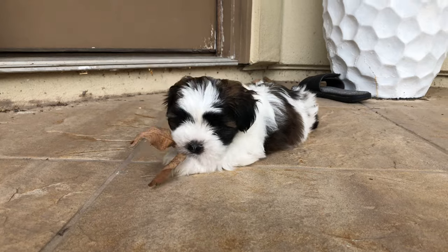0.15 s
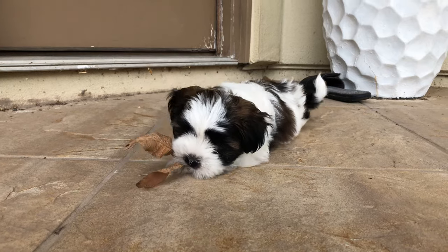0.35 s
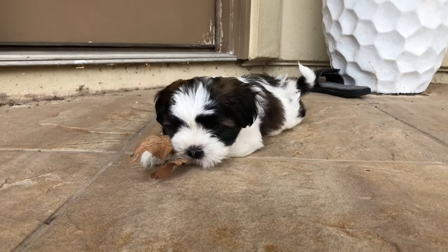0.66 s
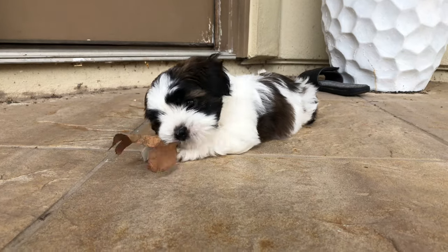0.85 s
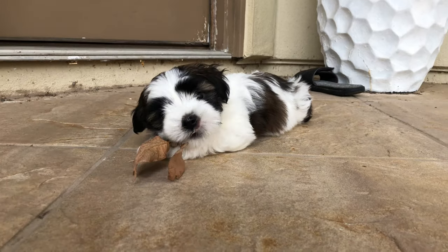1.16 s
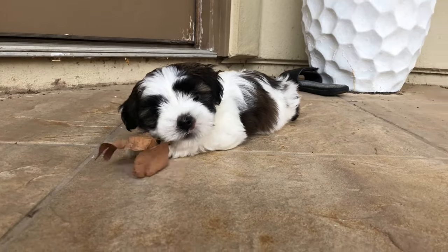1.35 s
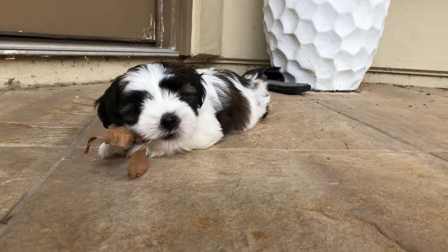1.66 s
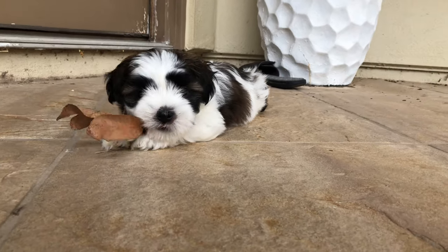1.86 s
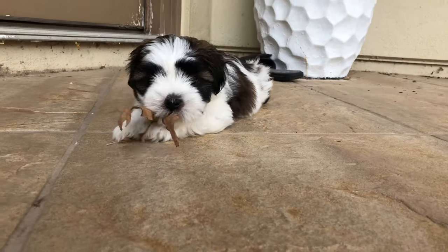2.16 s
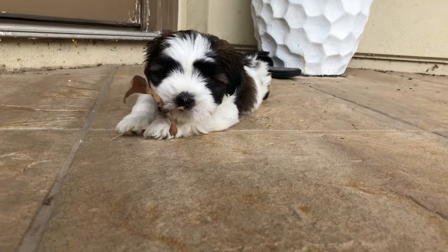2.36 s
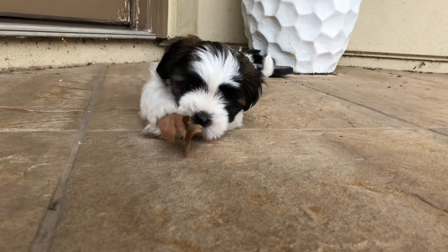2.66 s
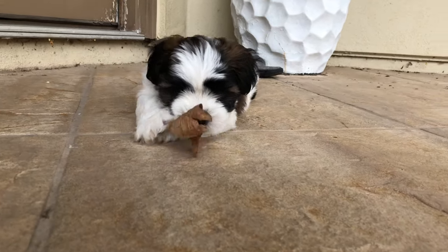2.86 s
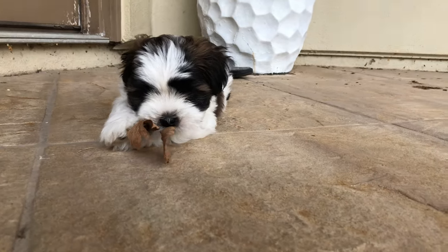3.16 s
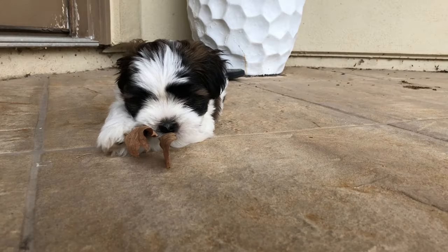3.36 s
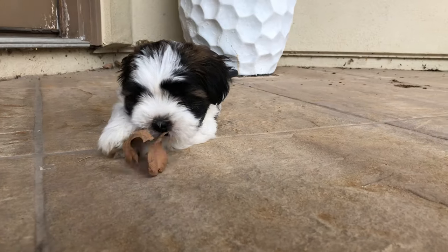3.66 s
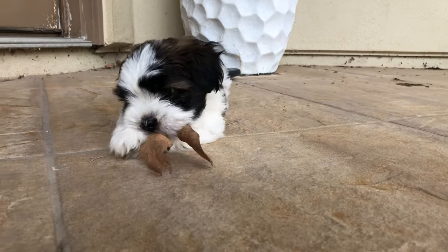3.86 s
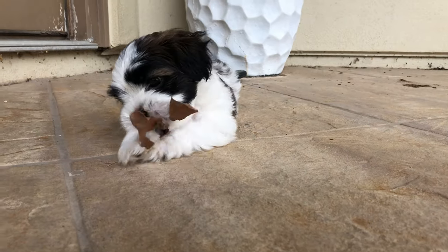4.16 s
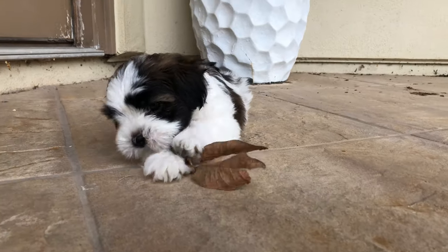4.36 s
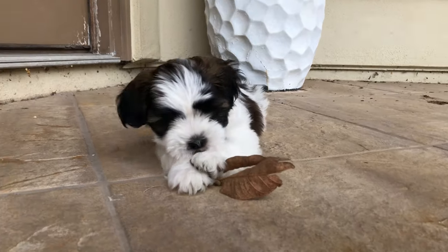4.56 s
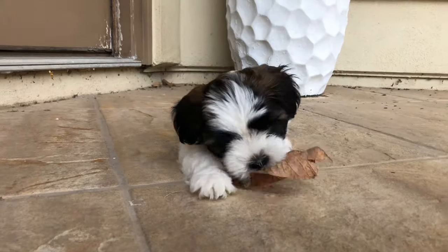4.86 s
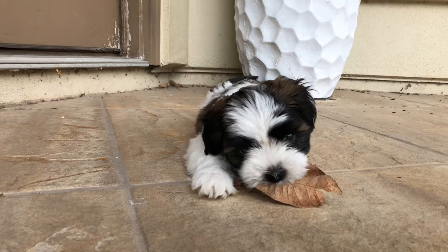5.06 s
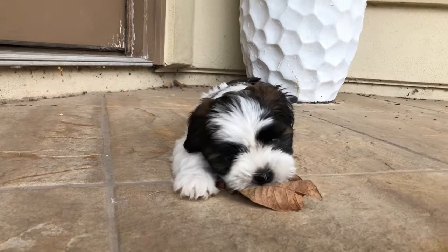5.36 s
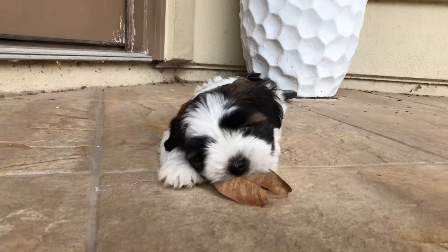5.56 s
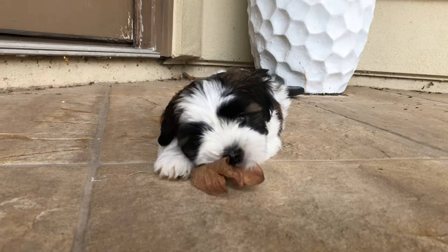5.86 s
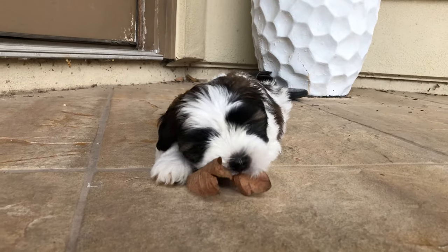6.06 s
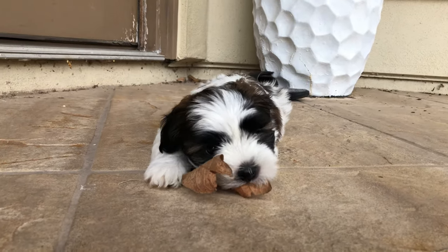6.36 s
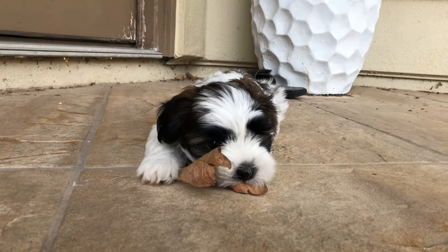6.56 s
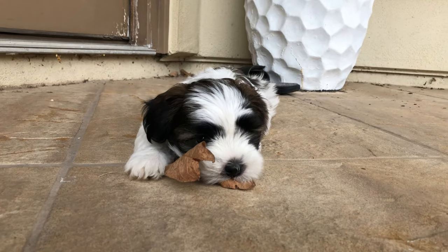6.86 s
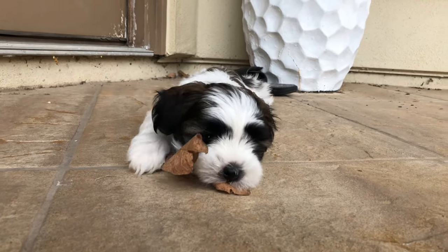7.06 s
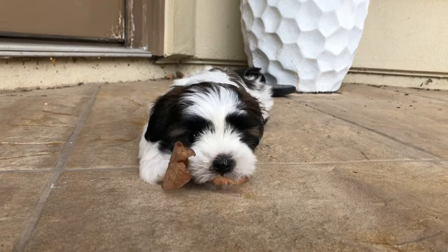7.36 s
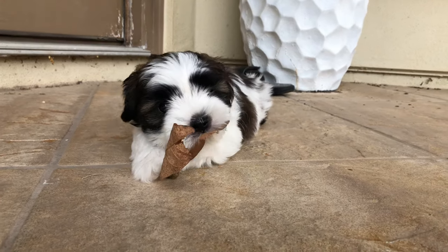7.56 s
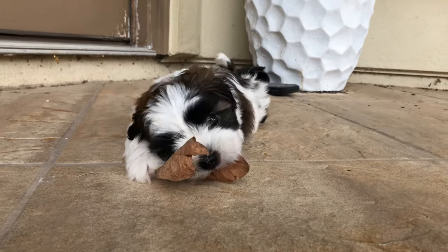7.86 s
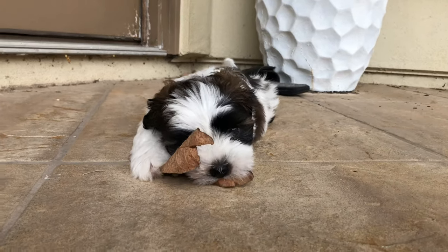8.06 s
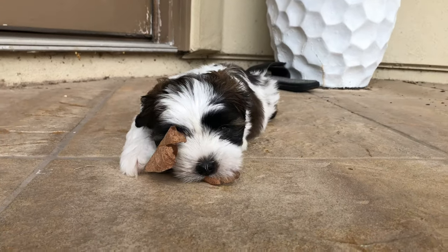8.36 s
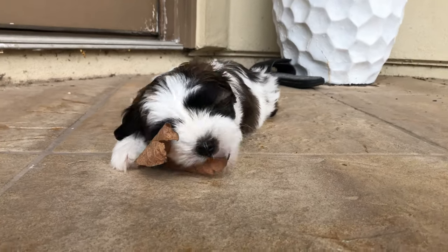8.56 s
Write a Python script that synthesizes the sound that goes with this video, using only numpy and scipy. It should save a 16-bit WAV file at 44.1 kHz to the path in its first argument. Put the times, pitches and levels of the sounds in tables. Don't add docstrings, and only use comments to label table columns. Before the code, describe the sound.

Dry leaf snaps, crackles and scrapes on tile in irregular bursts, with a thin even insect buzz, a few faint bird whistles and low traffic behind.

```python
import sys
import numpy as np
from scipy import signal
from scipy.fft import rfft, irfft
from scipy.io import wavfile
from scipy.ndimage import uniform_filter1d

SR = 44100
rng = np.random.default_rng(int(sys.argv[2]) if len(sys.argv) > 2 else 0)


def natural_amplitude(level_db):
    exponent = np.asarray(level_db, float) / 20
    return 10 ** exponent


def int16_out(signal):
    q = np.round(np.clip(np.atleast_2d(signal).T, -1, 1) * 32767)
    wavfile.write(sys.argv[1], SR, q.astype(np.int16))


N = 384111
TIME = np.arange(N) / SR


def cracks():
    out, t = np.zeros(N + 4096), np.arange(2048) / SR
    tears = edge_snaps() + rips() + pops() + knocks() + bites()
    slips = dull_slips() + open_slips() + bright_slips()
    for middle_s, ms, db, ring_hz, body_db, fizz_db in tears + ticks() + crumbs() + chatter() + slips:
        length_s = max(ms, 1) / 1000
        u = t / length_s
        burst = (u / .5) ** 2 * np.exp(-1.5 * (u / .5) ** 1.5)
        trail = natural_amplitude(-34) * np.minimum(u, 1) * np.exp(-u / 1.5)
        push = fractures(2048, scatter_db=3.2, clump=16) * (burst + trail)
        clean_break = np.linalg.norm(push[0]) * (1.8 / ms) ** 3
        push[:, int(.4 * length_s * SR)] += clean_break
        sound = leaf(push, ring_hz, body_db, fizz_db, ring_db=-2, width=max(.075, .15 / ms),
                     own=own_colour(middle_s))
        i = int((middle_s - length_s / 2) * SR)
        out[i:i + 2048] += sound * natural_amplitude(db) * np.sqrt(length_s * SR / len(t))
    return out[:N]


# middle in seconds, length in ms, level in dB, ring in Hz.
SNAPS = [(1.4515, 10.7, -38, 3900), (2.8038, 3.1, -43, 2950), (3.0565, 2.5, -43.5, 3120),
         (3.7377, 8.2, -42, 7200), (3.798, 3.7, -39, 3930), (4.2065, 2.5, -42, 2520),
         (5.1551, 1.7, -25.5, 6300), (5.5242, 1.8, -36, 3070), (5.9343, 8.1, -45, 6500),
         (6.2422, 2, -42, 3460), (6.527, 3.2, -34.5, 2640), (6.538, 1.1, -37, 3210),
         (6.5472, 1.55, -36, 3200), (6.5926, 2.4, -44, 5220), (7.1008, 2.72, -20.5, 9500),
         (7.5857, 1.32, -19, 4950), (8.048, 2, -34, 3997), (8.0497, 2.3, -22, 4550),
         (8.052, 0.89, -30, 6100), (8.063, 2.27, -36, 2600), (8.068, 1.3, -36, 5000),
         (8.0727, 3.8, -39, 2640), (8.079, 2.9, -31, 2660), (8.1082, 1, -37, 3880),
         (8.1291, 1.95, -28, 4230), (8.1418, 2.4, -43, 4180), (8.1518, 1.7, -42, 6150),
         (8.1585, 1.43, -18, 4800), (8.5897, 3.1, -42, 4730)]


def edge_snaps():
    return with_timbre(SNAPS, body_db=-25, fizz_db=0.76)


# middle in seconds, length in ms, level in dB, ring in Hz.
RIPS = [(.696, 5, -45, 3520), (.929, 7.6, -43, 3710), (1.0793, 3.6, -37.5, 2740),
        (1.1782, 4.2, -38.5, 2850), (1.2286, 2.3, -49, 2960), (2.9955, 2.8, -32, 4970),
        (3.101, 4.5, -41.5, 3850), (4.4064, 2, -20.5, 4350), (4.4095, 5.8, -19.5, 2700),
        (5.1413, 0.93, -20.5, 3680), (5.1617, 4.5, -18, 6300), (5.21, 2.3, -31, 3580),
        (5.3634, 2.4, -38, 2760), (5.4298, 4.6, -36.5, 3524), (5.4872, 3.5, -25.5, 4250),
        (5.5051, 8.1, -27, 4800), (5.5419, 4.9, -20.5, 3330), (5.567, 2.8, -34, 2290),
        (5.5767, 5.2, -28, 3240), (5.6088, 7.1, -22, 3440), (5.6366, 4.4, -24.5, 6500),
        (5.647, 9.3, -30, 3400), (5.7662, 6.2, -32, 1990), (5.893, 2, -35, 5430),
        (5.8995, 3.9, -39.5, 2550), (8.0067, 2.3, -36, 3180), (8.1366, 2, -35, 5810),
        (8.1635, 2.7, -37, 4970)]


def rips():
    return with_timbre(RIPS, body_db=-19, fizz_db=-9)


# middle in seconds, length in ms, level in dB, ring in Hz.
POPS = [
    (.4916, 6.1, -35, 4140),
    (.5608, 4.3, -38.5, 3870),
    (.591, 11.8, -40, 4000),
    (.7972, 2.1, -39, 3020),
    (1.4728, 4.2, -37.5, 3080),
    (5.45, 3.6, -35, 3570),
    (5.5153, 3.8, -29, 3420),
    (6.9905, 7, -44.5, 3000),
    (8.6248, 3.18, -22.5, 2840),
]


def pops():
    return with_timbre(POPS, body_db=-31, fizz_db=-32)


# middle in seconds, length in ms, level in dB, ring in Hz.
KNOCKS = [(.355, 7.9, -47, 2530), (.4795, 3.7, -42, 4080), (.7828, 6.9, -38.5, 2960), (.812, 11, -41, 3150),
          (4.4674, 6.8, -38, 2040), (4.8381, 7.4, -45.5, 2120), (4.8869, 2.4, -28.5, 3000),
          (4.977, 3, -39, 2400), (5.1506, 2.2, -30, 3530), (5.4245, 2.3, -39, 6280),
          (5.456, 2.5, -38, 4160), (5.5617, 4.6, -36.5, 3110), (5.5946, 6.9, -43, 2350),
          (5.8214, 12.3, -41.5, 3470), (6.1034, 3.3, -48, 1780), (6.2174, 2.4, -35.5, 1720),
          (7.9677, 3.2, -36.5, 4450), (8.6662, 5.7, -40, 2900)]


def knocks():
    return with_timbre(KNOCKS, body_db=-0.53, fizz_db=-20)


# middle in seconds, length in ms, level in dB, ring in Hz.
BITES = [(.6862, 5.1, -47, 3270), (1.5366, 3.8, -39.5, 1860), (2.84, 18, -39.5, 2510),
         (3.8588, 7.9, -46.5, 3320), (4.3894, 4.1, -26.5, 4440), (4.486, 12.7, -37.5, 3570),
         (4.9415, 7.5, -34.5, 2660), (5.1213, 6, -38.5, 3410), (5.3829, 3.7, -41, 3730),
         (5.6797, 7.8, -28, 1810), (6.0358, 2.4, -41.5, 5800), (6.1354, 3.5, -40, 1790),
         (6.1604, 1.7, -30.5, 3480), (6.1785, 1.8, -32, 1750), (6.4626, 3.4, -26, 5750),
         (7.19, 3.1, -46, 5790), (8.2528, 0.46, -39.5, 4160), (8.6322, 4.8, -34.5, 5400)]


def bites():
    return with_timbre(BITES, body_db=-3, fizz_db=-6.5)


# middle in seconds, level in dB, ring in Hz.
DULL_SLIPS = [(0.573, -48, 4110), (0.762, -37, 3100), (0.772, -32, 3400), (0.82, -36, 2430),
              (0.9555, -47, 2930), (2.0965, -46, 3640), (2.8154, -52, 2390), (2.826, -46, 2450),
              (3.983, -51, 3800), (4.439, -42, 2000), (4.8722, -45, 4050), (4.8968, -39, 1490),
              (4.9829, -39, 2150), (5.1464, -32, 3450), (5.3177, -42, 1380), (5.4454, -39.5, 1500),
              (5.6302, -31, 3360), (6.4375, -47, 1260), (6.4695, -44, 1150), (6.961, -48, 2980),
              (6.977, -45.5, 2900), (7.119, -38.5, 3318), (7.4656, -50, 2830), (7.5385, -53, 4400),
              (7.551, -51, 4300), (7.7805, -49, 2797), (8.0014, -40, 2480), (8.6604, -44, 2610)]


def dull_slips():
    return with_timbre(with_length(DULL_SLIPS, 3.3), body_db=-11.5, fizz_db=-16)


# middle in seconds, level in dB, ring in Hz.
OPEN_SLIPS = [(0.6948, -38, 3420), (0.7416, -36, 3120), (0.7521, -49, 1210), (0.8376, -37, 3100),
              (1.1723, -38, 2950), (1.1865, -36, 2130), (1.2286, -45, 2830), (1.4437, -45, 3940),
              (1.5471, -42, 2820), (1.5543, -37, 1210), (2.9324, -43.5, 1960), (2.9765, -44, 4750),
              (2.9894, -45, 4260), (3.25, -53, 3000), (3.8157, -41, 3680), (3.9255, -52, 4400),
              (3.936, -49, 4500), (4.9469, -35, 2350), (5.1859, -41, 5060), (5.1952, -46, 4690),
              (5.462, -36, 2430), (5.6232, -31, 3920), (5.7582, -39, 2250), (6.0994, -42, 1480),
              (6.1726, -36, 2170), (6.1833, -36, 1580), (7.1018, -35, 3720), (7.232, -51, 2900),
              (7.268, -57, 2690), (7.3075, -48, 1520), (7.318, -49, 4700), (7.3489, -46, 4760),
              (7.357, -47, 5030), (7.4427, -48, 5500), (7.5275, -45, 4460), (7.112, -43, 9300),
              (7.7275, -50, 2500), (7.792, -47, 3520)]


def open_slips():
    return with_timbre(with_length(OPEN_SLIPS, 2.43), body_db=-14, fizz_db=-6.5)


# middle in seconds, level in dB, ring in Hz.
BRIGHT_SLIPS = [(0.2469, -45, 2500), (0.5045, -53, 3570), (0.6792, -50, 3120), (0.8616, -49, 3010),
                (1.615, -50, 2950), (2.0786, -54, 3550), (2.792, -56, 2170), (2.8645, -50, 2360),
                (2.8877, -51, 2450), (2.941, -48, 4630), (2.9553, -45, 4690), (3.0019, -56, 5100),
                (4.2705, -51, 3420), (3.8079, -43, 1290), (3.8656, -45, 5230), (5.1751, -42, 5300),
                (5.4931, -42, 3060), (5.5017, -34, 3640), (6.1564, -47, 1210), (6.4915, -47, 5920),
                (6.5797, -43, 3320), (7.3649, -51, 6180), (7.596, -60, 3320), (8.1229, -53, 3490),
                (8.5977, -48, 5710)]


def bright_slips():
    return with_timbre(with_length(BRIGHT_SLIPS, 1.4), body_db=-10, fizz_db=3.8)


# time in seconds, peak in dB, ring in Hz.
TICKS = [
    (0.114, -39, 6140),
    (1.694, -39, 2540),
    (1.9829, -40.5, 3120),
    (2.2602, -43, 6350),
    (2.361, -43, 1890),
    (3.967, -38, 3850),
    (4.3056, -37, 5420),
    (6.2764, -40, 2800),
    (7.701, -37.5, 5960),
    (8.452, -42, 6550),
]


def ticks():
    return [(s + .0015, 3, peak_db - 7, ring_hz, -12, -4) for s, peak_db, ring_hz in TICKS]


# time in seconds, peak in dB.
CRUMBS = [(0.85, -37.5), (1.2077, -40), (1.3653, -48), (1.5167, -40), (2.7811, -37), (2.874, -38),
          (3.8556, -40), (4.188, -42), (4.8574, -42), (5.1048, -43), (5.498, -23), (5.883, -41),
          (6.4842, -38), (7.3357, -43), (7.4599, -46), (8.4811, -43)]


def crumbs():
    length_ms, gain_db, ring_hz, body_db, fizz_db = 1.7, -19, 5530, -21, 15.5
    return [(s + .0015, length_ms, peak_db + gain_db, ring_hz, body_db, fizz_db) for s, peak_db in CRUMBS]


# start in seconds, length in ms, slips per second, level in dB.
CHATTER = [
    (6.095, 38, 150, -46.5),
    (6.156, 56, 190, -40.5),
]


def chatter():
    ring_hz, body_db, fizz_db, scatter_db = 1500, 3, -10, 2.5
    rows = []
    for start_s, ms, rate_hz, db in CHATTER:
        chance = rng.standard_normal((16, 2))
        times = start_s + (np.arange(16) + .15 * chance[:, 0]) / rate_hz
        for at_s, c in zip(times, chance[:, 1]):
            if at_s < start_s + ms / 1000:
                rows.append((at_s, 1.6, db + scatter_db * c, ring_hz, body_db, fizz_db))
    return rows


def rustles():
    out = np.zeros(N + SR)
    for start_s, ms, db, ring_hz, body_db, fizz_db in scrapes() + shoves() + crumples() + chews():
        t = np.arange(int((ms / 1000 + .15) * SR)) / SR
        after = np.maximum(t - ms / 1000, 0)
        edge = np.minimum(t / .005, 1) * (np.exp(-after / .006) + natural_amplitude(-10) * np.exp(-after / .05))
        edge *= 1 - .3 * np.minimum(2000 * t / ms - 1, 1) ** 2
        slips = (rng.random(len(t)) < 330 / SR) * rng.random(len(t)) ** 1.5
        slips = uniform_filter1d(signal.lfilter([1], [1, -.96], slips), 18)
        jerks = .33 + 1.6 * slips
        push = fractures(len(t), scatter_db=1.5, clump=110) * jerks * edge
        sound = leaf(push, ring_hz, body_db, fizz_db + 5, ring_db=1.5, width=.07, own=own_colour(start_s))
        i = int((start_s - .003) * SR)
        out[i:i + len(t)] += sound * natural_amplitude(db) / np.sqrt(1 + 150 / ms)
    return out[:N]


# start in seconds, length in ms, level in dB, ring in Hz.
SCRAPES = [(1.168, 92, -50, 2740), (1.266, 38, -61, 2510), (1.533, 40, -50.5, 3580),
           (1.612, 44.5, -53.5, 2720), (3.801, 71, -53, 2960), (3.885, 59, -60.5, 1600),
           (4.92, 61, -61, 2130), (6.165, 43, -47, 1510), (7.1, 45, -51, 3680), (7.133, 36, -59, 1780),
           (7.305, 63, -58, 1600), (7.968, 59, -60, 3330)]


def scrapes():
    return with_timbre(SCRAPES, body_db=4.2, fizz_db=-5.5)


# start in seconds, length in ms, level in dB, ring in Hz.
SHOVES = [
    (.883, 90, -59, 3690),
    (3.124, 124, -62.5, 2340),
    (4.406, 19.6, -33, 2470),
    (4.481, 30, -46.5, 3440),
    (4.884, 26.5, -41, 2080),
    (5.139, 40, -48, 3670),
    (5.313, 43, -55.5, 3300),
    (5.778, 44, -52.5, 3300),
    (7.455, 70, -59.5, 1880),
    (8.641, 23, -59, 2770),
]


def shoves():
    return with_timbre(SHOVES, body_db=-0.082, fizz_db=-19)


# start in seconds, length in ms, level in dB, ring in Hz.
CRUMPLES = [(.235, 33, -53.5, 3550), (.355, 110, -56, 4430), (.859, 32, -52.5, 1940),
            (1.355, 52, -58, 2980), (1.427, 29, -48.5, 3850), (1.463, 143, -58, 2900),
            (2.076, 30, -54, 3670), (2.33, 54, -65, 2500), (2.929, 44, -48, 4630), (3.009, 72, -57, 2520),
            (5.179, 34, -47, 3570), (5.489, 29, -36, 3550), (5.607, 42, -37.5, 3510),
            (5.833, 120, -61, 2460), (2.87, 58, -60.5, 1900), (7.2, 72, -61, 2600), (7.81, 220, -68, 3300),
            (6.466, 64, -61, 3010), (6.68, 22, -58.5, 3020), (7.59, 75, -59, 5300),
            (7.695, 56, -56.5, 3440), (8.048, 25, -53, 2630), (8.078, 145, -60, 5010), ]


def crumples():
    return with_timbre(CRUMPLES, body_db=-4.5, fizz_db=-7.5)


# start in seconds, length in ms, level in dB, ring in Hz.
CHEWS = [(.465, 49, -42, 4070), (.545, 52, -47, 4040),  (.669, 57, -48, 3520), (.735, 122, -42, 2980),
         (2.748, 125, -49.5, 2550), (2.989, 27, -49, 5000), (3.728, 20, -48, 2550), (4.431, 46, -53, 2060),
         (4.825, 53, -52, 3740), (5.658, 44, -48.5, 1740), (5.752, 22, -40.5, 2660), (6.218, 38, -51, 4700),
         (7.775, 46, -60, 2630), (6.357, 19, -46.5, 3610), (6.96, 50, -59, 3030), (7.529, 25, -51.5, 4390)]


def chews():
    return with_timbre(CHEWS, body_db=-4.5, fizz_db=-22)


def with_timbre(rows, body_db, fizz_db):
    return [(*row, body_db, fizz_db) for row in rows]


def with_length(rows, ms):
    return [(s, ms, db, ring_hz) for s, db, ring_hz in rows]


def fractures(n, scatter_db, clump):
    jumps = rng.standard_normal((2, n))
    slow = uniform_filter1d(jumps[1], clump) * np.sqrt(clump)
    return rng.standard_normal((3, n)) * natural_amplitude(scatter_db * (.6 * jumps[0] + slow))


def leaf(push, ring_hz, body_db, fizz_db, ring_db, width, own=None):
    other_hz, other_db = 1900 * 3.3 ** rng.random(), ring_db - 4
    top_db = fizz_db - 3.5
    if own:
        (other_hz, body_db, fizz_db, top_db), other_db = own, ring_db - 0.5
    first = band(push[0], ring_hz * (1 - width), ring_hz * (1 + width), order=1)
    second = band(push[1], other_hz * (1 - width), other_hz * (1 + width), order=1)
    broad = band(push[0], min(.7 * ring_hz, 2100), np.clip(1.7 * ring_hz, 3500, 6800))
    middle = level(first, ring_db) + level(second, other_db) + level(broad, -4.5)
    body = band(.6 * push[0] + push[1], 700, 1600, order=1)
    torn = push[0] + .5 * push[2]
    fizz = level(band(torn, 6500, 10500), fizz_db - 1.5) - level(band(torn, 12000, 17500), top_db)
    return level(middle, 0) + level(body, body_db) + fizz


# time in seconds, second ring in Hz, body under 1.8 kHz in dB,
# fizz over 6.5 kHz in dB, top over 11.5 kHz in dB.
COLOURS = [(0.465, 2000, -7.5, -18, -19), (0.4916, 1940, -21, -20, -17), (0.591, 2530, -21, -24, -30),
           (1.0793, 5900, -9, -4, -20), (1.4515, 2670, -23, 1, -19), (1.5366, 2780, 0, -5, 2),
           (2.84, 6800, -23, -12, -16), (2.9955, 7240, -24, -21, -13), (3.0565, 7960, -11, 5, 8),
           (3.7377, 2630, -26, 6, -23), (3.798, 7270, -21, -5, -11), (4.3894, 6060, -2.5, -13, -4),
           (4.4086, 4230, -9, -4, -18), (4.8869, 3860, -1.5, -18, -12), (4.9415, 7420, -6, -1, -13),
           (5.1413, 5850, -25, -13, -13), (5.1506, 2200, -4.5, -8, -11), (5.1617, 3570, -10.5, -18, -15),
           (5.21, 5660, -13, -8, -16), (5.4872, 2800, -10.5, -3, -16), (5.5051, 3640, -10.5, -15, -9),
           (5.5153, 2260, -27, -18, -15), (5.5419, 7000, -15.5, -9, -15), (5.567, 2940, -12, -2, -19),
           (5.5767, 7100, -15, -17, -9), (5.6088, 2330, -11, -6, -12), (5.6366, 3040, -28, -11, -15),
           (5.647, 7250, -7.5, -19, -16), (5.6797, 3420, -6, -2, -21), (5.7662, 3500, -10, -1, -16),
           (6.1604, 5530, -4.5, 0, -7), (6.4626, 8200, -5, -11, -3), (6.527, 8070, -19, 2, 5),
           (7.1012, 6140, -17.5, -2, -19), (7.5857, 3150, -19.5, 0, -5), (8.0497, 8500, -13.5, 2.5, -3),
           (8.079, 7200, -18, -14, 4), (8.1291, 5190, -27, -6, 6), (8.1585, 6800, -39, -9, -12),
           (8.6248, 4900, -14.5, -26, -24)]


def own_colour(s):
    return next((row[1:] for row in COLOURS if abs(row[0] - s) < .003), None)


def porch(x):
    t = np.arange(int(.2 * SR)) / SR
    tail = rng.standard_normal(len(t)) * natural_amplitude(-60 * t / .1) * np.minimum(t / .002, 1)
    return x + signal.fftconvolve(x, band(level(tail, -50.5), 330, 6000, order=1))[:N]


# time in seconds, rate in Hz.
CLICK_RATE = [
    (1.8, 508.15),
    (3.4, 507.85),
    (4.6, 507.2),
    (6.8, 507.1),
    (8.4, 507.5),
]
# time in seconds, level in dB.
CICADA_LEVEL = [
    (0.0, -50.5),
    (1.82, -51.5),
    (7.54, -50.5),
    (8.71, -49),
]
# frequency in Hz, gain in dB.
CICADA_BODY = [(4000, -44), (5000, -20), (5570, 2), (6150, 2), (6620, 1.5), (7150, 6), (8100, 3.5),
               (8630, 2), (9150, 6), (10300, 4.5), (11200, 0.5), (11900, -10), (12500, -45)]


def cicada():
    throb_hz, wobble_rad, fade_db = 70, .035, 3.8
    throb = 2 * np.pi * throb_hz * TIME
    click = 2 * np.pi * np.cumsum(np.interp(TIME, *np.transpose(CLICK_RATE))) / SR
    click, song = click + wobble_rad * np.sin(throb), 0
    for k in range(10, 24):
        for side in (-1, 0, 1):
            turn = 2 * np.pi * rng.random() + .5 * drift(5)
            line_db = fade_db * drift(1.6) - 4 * abs(side) - .4 * max(k - 15, 0)
            song = song + natural_amplitude(line_db) * np.cos(k * click + side * throb + turn)
    chorus = 0
    for hz, db in [(6060, 0), (9170, 0.66), (7270, -1.0), (10600, 2.0)]:
        hiss = band(rng.standard_normal(N), hz * .93, hz * 1.07, order=1)
        chorus = chorus + hiss * natural_amplitude(db + 2.4 * drift(1.6))
    both = level(colour(song, CICADA_BODY), -2.5) + level(colour(chorus, CICADA_BODY), -2.5)
    return both * natural_amplitude(np.interp(TIME, *np.transpose(CICADA_LEVEL)) - 2.5)


# start in seconds, length in seconds, first pitch in Hz, last pitch in Hz, top level in dB.
BIRD = [(2.545, .04, 4413, 4150, -67), (2.577, 0.115, 4070, 4140, -56), (2.68, .08, 4090, 4180, -57),
        (4.01, .03, 4040, 4000, -59), (4.01, .028, 4290, 4250, -62), (4.004, .03, 4500, 4480, -62),
        (6.892, .04, 3260, 3360, -65), (4.989, 0.16, 3500, 3740, -52), (5.232, 0.052, 3720, 3750, -60),
        (6.203, 0.056, 4670, 4680, -50), (6.36, 0.092, 4390, 4200, -47), (6.492, 0.13, 3240, 3180, -58)]


def bird():
    out = np.zeros(N)
    for start_s, length_s, first_hz, last_hz, top_db in BIRD:
        s = start_s + length_s * np.array([0, 0.34, 1])
        db = top_db + np.array([-15, 0, -12])
        edge = np.clip(np.minimum(TIME - s[0], s[-1] - TIME) / 0.0048, 0, 1)
        pitch_hz = np.interp(TIME, [s[0], s[-1]], [first_hz, last_hz])
        phase = 2 * np.pi * np.cumsum(pitch_hz) / SR
        out += np.sqrt(2) * edge * natural_amplitude(np.interp(TIME, s, db)) * np.sin(phase)
    return out * natural_amplitude(1.5 * walk(40)) + natural_amplitude(-11) * np.roll(out, int(.023 * SR))


# frequency in Hz, density in dB per Hz.
AIR = [(20, -23), (48, 3), (114, 3), (273, -0.5), (506, -2.5), (800, -8), (1000, -12.5), (1500, -14),
       (4800, -22), (10000, -26), (11800, -28), (12400, -36), (14500, -26), (16500, -26)]


def air():
    hiss = colour(rng.standard_normal(N), AIR)
    edges_hz = 20 * 2.3 ** np.arange(9)
    rumble = 0
    for lo_hz, hi_hz in zip(edges_hz[:-1], edges_hz[1:]):
        rumble = rumble + band(hiss, lo_hz, hi_hz, order=1) * natural_amplitude(1.2 * walk(2.5))
    return level(rumble, -52.5) + natural_amplitude(-68.5) * np.sin(2 * np.pi * 59 * TIME)


def level(x, db):
    return x * natural_amplitude(db) / np.sqrt(np.mean(x ** 2))


FILTERS = {}


def band(x, lo_hz, hi_hz, order=2):
    key = lo_hz, hi_hz, order
    if key not in FILTERS:
        FILTERS[key] = signal.butter(order, [lo_hz, hi_hz], "bandpass", fs=SR, output="sos")
    return signal.sosfilt(FILTERS[key], x)


def colour(x, points):
    hz, db = np.transpose(points)
    f = np.arange(len(x) // 2 + 1) * SR / len(x) + 1
    return irfft(rfft(x) * natural_amplitude(np.interp(np.log(f), np.log(hz), db)), len(x))


def walk(rate_hz):
    k = int(SR / rate_hz)
    held = np.repeat(rng.standard_normal(N // k + 1), k)
    return uniform_filter1d(uniform_filter1d(held, k), k)[:N]


def drift(rate_hz):
    return np.interp(TIME * rate_hz, np.arange(64), rng.standard_normal(64))


def scene():
    return (porch(rustles() + cracks()) + cicada() + bird() + air())[None]


def band_limit(x):
    return signal.sosfilt(signal.butter(12, 17020, fs=SR, output="sos"), x)


def record(dry):
    rounded = 1.5 * np.tanh(dry / 1.5)
    top_cut = signal.ellip(6, .2, 14, 15900, fs=SR, output="sos")
    return band_limit(signal.sosfilt(top_cut, rounded))


dry = scene()
out = record(dry)
int16_out(out)
```